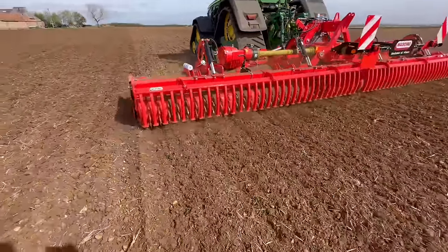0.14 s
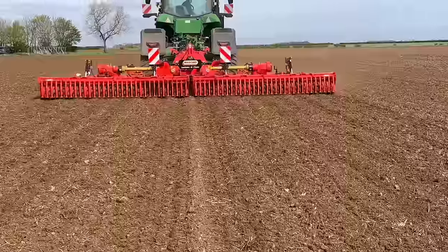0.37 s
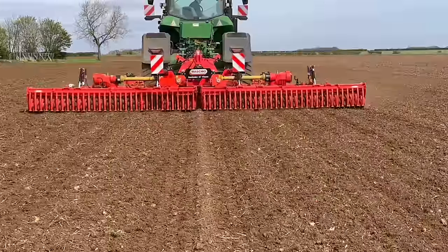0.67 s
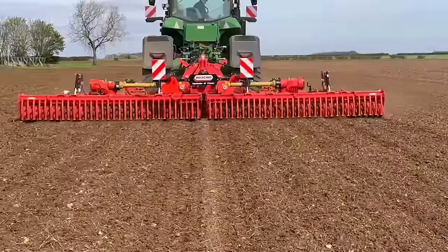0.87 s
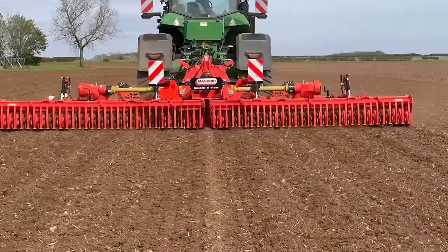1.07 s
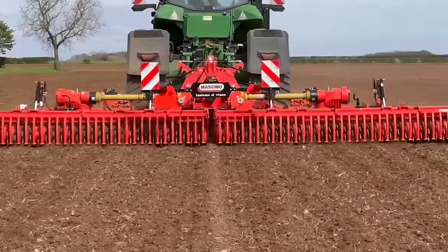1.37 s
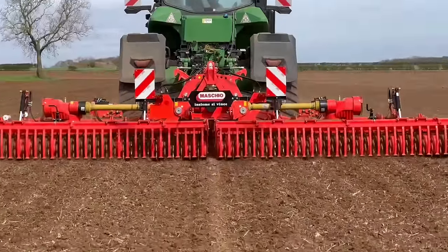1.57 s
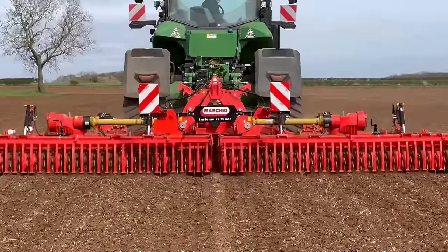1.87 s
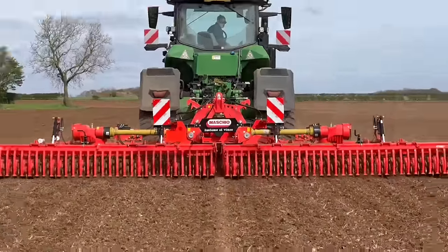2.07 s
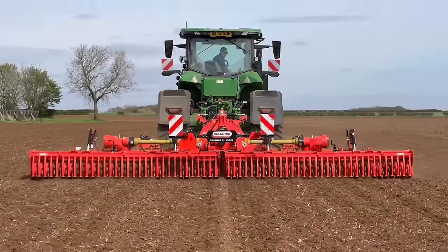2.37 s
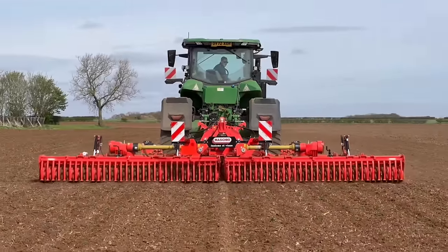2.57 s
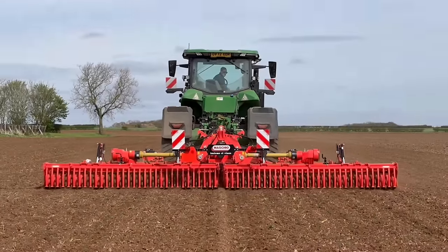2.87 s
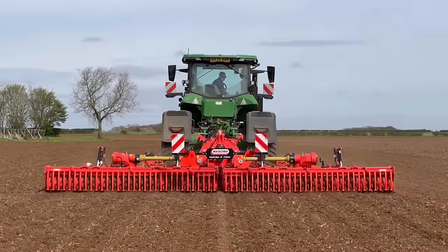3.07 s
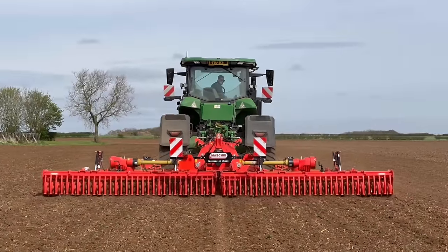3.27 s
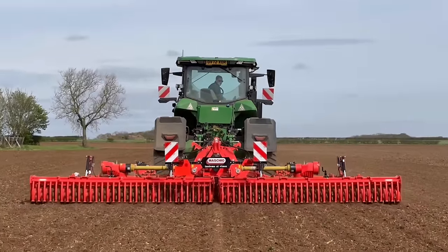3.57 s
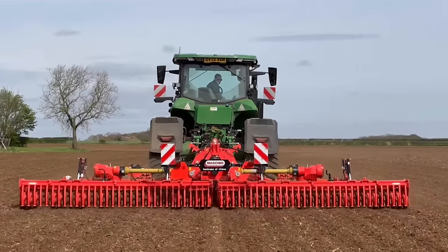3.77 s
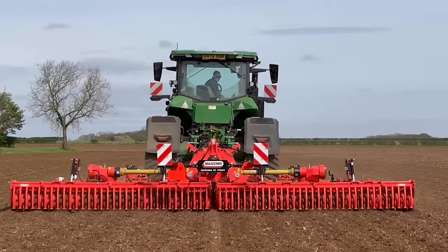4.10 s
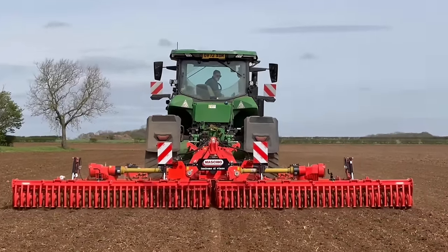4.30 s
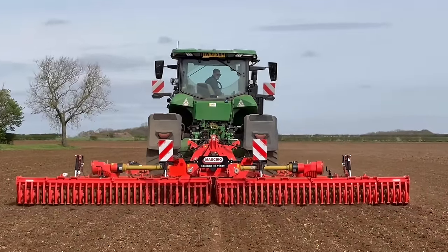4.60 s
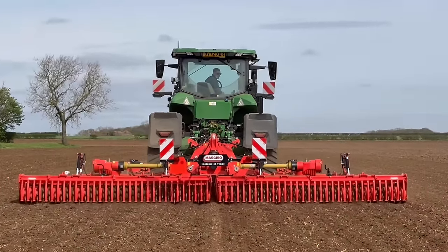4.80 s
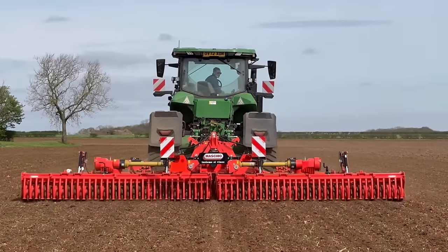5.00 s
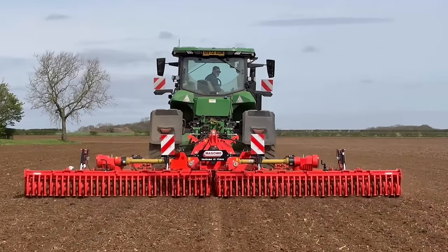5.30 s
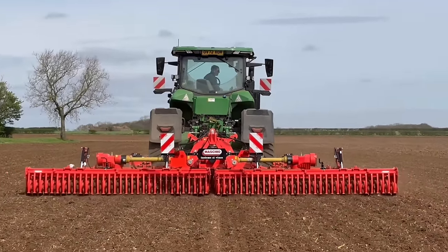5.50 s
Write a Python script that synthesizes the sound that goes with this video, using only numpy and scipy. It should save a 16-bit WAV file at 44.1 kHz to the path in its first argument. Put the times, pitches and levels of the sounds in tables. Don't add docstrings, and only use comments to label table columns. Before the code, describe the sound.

A loud bright burst of steel tines grinding dry soil close by cuts to a quieter, whining harrow behind a tractor, with thumping wind.

```python
import sys
import numpy as np
from scipy import signal
from scipy.fft import rfft, irfft
from scipy.io import wavfile
from scipy.ndimage import uniform_filter1d, map_coordinates

SR = 44100
rng = np.random.default_rng(int(sys.argv[2]) if len(sys.argv) > 2 else 0)


def wrap_up_sound(samples):
    columns = np.atleast_2d(samples).T
    tamed = np.clip(columns, -1, 1)
    steps = np.round(tamed * 32767).astype(np.int16)
    wavfile.write(sys.argv[1], SR, steps)


def to_linear_factor(level_db):
    exponent = np.asarray(level_db, float) / 20
    return 10 ** exponent


N = 249165

CUT_S = 0.299
RECEDE_DB_PER_S = 1.395
BAR_CYCLES = 130

# start in seconds, peak level in dB, ring pitch in Hz, ring t60 in seconds, share of the crack (0-1).
STONE_HITS = [
    (1.071, -27.5, 4620, .05, .6),
    (1.41, -34, 3940, .04, .3),
    (1.854, -36, 3640, .03, .25),
    (2.85, -36.5, 5800, .07, .3),
    (2.926, -40, 6000, .03, .15),
    (3.229, -36.5, 5800, .1, .3),
    (3.366, -41, 6100, .03, .3),
    (4.854, -39, 8200, .04, .3),
]


def rms_one(x):
    return x / np.sqrt(np.mean(np.abs(x) ** 2) + 1e-20)


def in_time(rows):
    s, *columns = np.transpose(rows)
    return [np.interp(np.arange(N) / SR, s, c) for c in columns]


def drift(rate_hz, count=N, per_s=SR):
    hop = max(int(per_s / 2000), 1)
    r = np.exp(-2 * np.pi * rate_hz * hop / per_s)
    settle = count // hop + 1
    noise = rng.standard_normal(2 * settle)
    slow = signal.lfilter([1], [1, -2 * r, r * r], noise)[settle - 1:]
    return np.interp(np.arange(count) / hop, np.arange(len(slow)), rms_one(slow))


def colour(x, spectrum, resonances=()):
    hz = np.maximum(np.fft.rfftfreq(N, 1 / SR), 1)
    points = np.array(spectrum)
    db = np.interp(np.log(hz), np.log(points[:, 0]), points[:, 1])
    for centre_hz, width_hz, peak_db in resonances:
        db += peak_db / (1 + ((hz - centre_hz) / width_hz) ** 2)
    return irfft(rfft(x) * to_linear_factor(db), N)


def band_rms(x, low_hz, high_hz):
    band = signal.butter(4, [low_hz, high_hz], "band", fs=SR, output="sos")
    return np.std(signal.sosfilt(band, x))


def grit(per_s, spread_db, noise_share):
    sizes = to_linear_factor(spread_db * np.minimum(rng.exponential(1, N), 5)) * rng.choice([-1, 1], N)
    clicks = rms_one(sizes * (rng.random(N) < per_s / SR))
    return clicks + noise_share * rng.standard_normal(N)


def clatter(per_s, cycles):
    bars = 40
    clicks = grit(per_s, 2.0, noise_share=0)
    dealt = rng.integers(0, bars, N)
    bar_hz = np.geomspace(2800, 14000, bars) * rng.uniform(.98, 1.02, bars)
    out = np.zeros(N)
    for k, hz in enumerate(bar_hz):
        r = to_linear_factor(-60 * hz / (cycles * SR))
        w = 2 * np.pi * hz / SR
        struck = clicks * (dealt == k) + 1e-18
        out += hz * np.sin(w) * signal.lfilter([1], [1, -2 * r * np.cos(w), r * r], struck)
    return rms_one(out)


def tooth_tone(hz, wobble_hz, rough):
    uneven = drift(wobble_hz) + 1j * drift(wobble_hz)
    turning = np.exp(2j * np.pi * np.cumsum(hz * np.ones(N)) / SR)
    return rms_one(np.real((1 + rough * uneven) * turning))


def tines_beside():
    # time in seconds, level in dB, extra grit in dB.
    passing = [
        (0.0, -17, 2),
        (0.1, -18.5, -0.5),
        (0.162, -18.5, -2),
        (0.22, -19, -3),
        (0.245, -19, 1.5),
        (0.295, -18.5, 0.5),
    ]
    # frequency in Hz, density in dB per Hz.
    near_spectrum = [(18, -40), (30, 1), (102, -1.5), (284, -9.5), (409, -8), (443, -6.5), (829, -7),
                     (1080, -5.5), (1590, -2), (2620, -8), (5300, -18), (8270, -25.5), (15500, -35)]
    # centre in Hz, width in Hz, height in dB.
    near_resonances = [(817, 64, 10.5), (1254, 74, 11.5), (1627, 22, 6), (2600, 220, 5), (3045, 96, 5.5),
                       (3740, 37, 8), (4280, 93, 5.5), (4740, 32, 7), (5980, 79, 6), (8060, 260, 8.5),
                       (1100, 110, -5.5), (1357, 160, -9.5), (2915, 33, -23)]
    # pitch in Hz, rms in dB.
    near_lines = [(147, -39.5), (411, -40.5)]
    rubbing = grit(9000, 1.2, noise_share=2.0) + 1.27 * clatter(5000, BAR_CYCLES)
    sound = colour(rubbing, near_spectrum, near_resonances)
    level_db, grit_db = in_time(passing)
    grit_band = signal.butter(2, 4200, "high", fs=SR, output="sos")
    sound += (to_linear_factor(grit_db) - 1) * signal.sosfilt(grit_band, sound)
    sound *= to_linear_factor(level_db + .5 * drift(15.0)) / band_rms(sound, 300, 12000)
    return sound + sum(to_linear_factor(db) * tooth_tone(hz, 11.0, rough=0.18) for hz, db in near_lines)


def ground_db(hz, at=slice(None)):
    # time in seconds, fifth comb peak in Hz, comb depth in dB.
    echo = [
        (0.31, 6080, 0.7),
        (2.4, 6060, 0.7),
        (3.2, 5800, 0.1),
        (3.9, 5970, 2),
        (4.3, 5680, 4),
        (4.7, 6080, 3),
        (4.95, 6120, 5),
        (5.15, 6050, 3),
        (5.45, 5970, 1.5),
        (5.65, 5940, 2.5),
    ]
    peak_hz, depth_db = in_time(echo)
    comb = np.cos(2 * np.pi * 5 * hz / peak_hz[at])
    return depth_db[at] * comb * np.interp(hz, [1930, 3300, 8500, 10500], [0, 1, 1, 0])


def gears():
    # time in seconds, place (0 close behind, 1 low in the wake, 2 trailing).
    places = [
        (2.45, 0),
        (2.65, 1),
        (3.65, 1),
        (3.9, 2),
    ]
    # time in seconds, whine swing in dB.
    load_swing = [(.31, 4.5), (.5, 5.5), (.72, -4), (1.4, 1), (1.66, -22), (1.79, 4), (1.97, 9.5),
                  (2.12, -11.5), (2.52, 10.5), (2.68, -6), (2.9, 0.5), (3.02, -3.5), (3.75, 4.5),
                  (3.88, -5), (3.98, 0), (4.98, 3.1), (5.07, -4), (5.25, .6)]
    # rms in dB close behind, in the wake and trailing, share of load swing.
    mesh_lines = [(-38.5, -45.5, -44.5, 0.15), (-43.5, -45, -49.5, .2), (-35.5, -36, -35.5, 0.75)]
    whine_rough = [.24, .24, .1]
    # sets in, full, lifts, gone (seconds).
    null_times = [2.45, 2.7, 3.46, 3.64]
    pair_rates = [1032, 1442, 1540, 1621, 1662, 1771, 1853, 2003, 2062, 2179, 2490, 2915, 3105, 3432, 3752,
                  4713]
    # rms in dB close behind, in the wake and trailing, wobble width in Hz.
    pair_levels = [(-49, -52, -51.5, 3), (-53, -55, -58, 3), (-48, -46, -51, 6), (-44, -51, -51, 10),
                   (-50, -54, -48, 12), (-55, -53, -52, 8), (-52, -46, -52, 8), (-54, -53, -53, 12),
                   (-50, -51, -55, 8), (-49, -50, -55, 5), (-55, -59, -54, 6), (-50, -50, -39.5, 60),
                   (-57, -54, -42.5, 10), (-53, -51, -44.5, 40), (-55, -56, -50.5, 25), (-62, -64, -54, 40)]
    tooth_hz = 409.65
    stage, = in_time(places)
    load_db, = in_time(load_swing)

    def at_place(values):
        return np.interp(stage, [0, 1, 2], values)

    first, second, third = [at_place(place_db) + share * load_db for *place_db, share in mesh_lines]
    null_db = -20 * np.interp(np.arange(N) / SR, null_times, [0, 1, 1, 0])
    out = to_linear_factor(first + null_db) * tooth_tone(tooth_hz, 5.6, rough=0.0085)
    out += to_linear_factor(second) * tooth_tone(2 * tooth_hz, 20.0, rough=.22)
    out += to_linear_factor(third) * tooth_tone(3 * tooth_hz, 38.0, rough=at_place(whine_rough))
    for hz, (*place_db, wobble_hz) in zip(pair_rates, pair_levels):
        level_db = at_place(place_db) + 1.1 * drift(1.5) + 1.9 * ground_db(hz)
        out += to_linear_factor(level_db) * tooth_tone(hz, wobble_hz, rough=wobble_hz / 7)
    return out


def spray():
    rise_s, fall_s = .007, .028
    late = np.arange(N) / SR - np.array(STONE_HITS)[:, :1]
    return np.max(np.exp(np.where(late < 0, late / rise_s, -late / fall_s)), axis=0)


def surges(x, band_db, shared_db, own_db):
    band_centres = [750, 1900, 3600, 7000, 12500]
    hz, s, cells = signal.stft(x, SR, nperseg=256)
    steps, per_s = len(s), SR / 128
    at = np.minimum((s * SR).astype(int), N - 1)
    place = np.interp(np.log(hz + 1), np.log(band_centres), np.arange(len(band_centres)))
    burst = shared_db * drift(14.0, count=steps, per_s=per_s)
    burst -= uniform_filter1d(burst, size=int(per_s / 5))
    rows = []
    for k, db in enumerate(band_db):
        own = own_db * drift(7.0, count=steps, per_s=per_s)
        rows.append(db[at] + burst * (min(k, 3) / 3) ** 3 + own)
    grid_points = np.meshgrid(place, np.arange(steps), indexing="ij")
    gain_db = map_coordinates(np.array(rows), grid_points, order=1)
    gain_db += ground_db(hz[:, None], at)
    return signal.istft(cells * to_linear_factor(gain_db), SR, nperseg=256)[1][:N]


def tines_behind():
    # frequency in Hz, density in dB per Hz.
    grind_spectrum = [(150, -49), (250, -58), (341, -20.5), (420, -6.5), (755, -8.5), (823, -6.5),
                      (1100, -7), (1220, -2), (1360, -8), (1590, -4), (2620, -7.5), (3450, -14),
                      (4030, -13.5), (15500, -42.5)]
    # centre in Hz, width in Hz, height in dB.
    trough_resonances = [(816, 285, 1), (1227.5, 39, 9), (1529, 15, 7), (1664, 16.4, 5.5), (2030, 30, 4),
                         (2974, 530, 5.5), (3080, 22, -2), (3405, 33, 9), (3714, 20.6, 6), (4490, 470, 2.5),
                         (6230, 210, 2.5), (8100, 520, 5.5), (10960, 1300, 5), (1276, 150, -3.5),
                         (2637, 55, -11), (6990, 570, -3), (9400, 550, -7.5)]
    # time in seconds, treble in dB.
    open_view = [(.31, -2.5), (1.3, -0.5), (2.45, -0.5), (2.65, -6), (3.55, -3.5), (3.72, -2), (3.9, 2),
                 (4.25, 2), (4.95, 2.5), (5.1, 2.5), (5.65, 4.5)]
    view_shares = [.05, .25, .7, 1.05, 1.4]
    spray_shares = [.6, .8, .8, .8, .3]
    rubbing = grit(6000, 2.24, noise_share=1.76) + 1.22 * clatter(4000, BAR_CYCLES)
    sound = colour(rubbing, grind_spectrum, trough_resonances)
    sound /= band_rms(sound, 500, 1100)
    level_db = -36 - RECEDE_DB_PER_S * np.arange(N) / SR
    view_db, = in_time(open_view)
    spray_db = 3.5 * spray()
    band_db = [level_db + view * view_db + thrown * spray_db for view, thrown in zip(view_shares, spray_shares)]
    return surges(sound, band_db, shared_db=1.16, own_db=0.74)


def engine():
    # pitch in Hz, rms in dB.
    exhaust_orders = [(49, -52), (98, -52), (147, -47), (196, -53), (243, -57)]
    orders = sum(to_linear_factor(db) * tooth_tone(hz, 6.3, rough=0.31) for hz, db in exhaust_orders)
    return to_linear_factor(0.5 - RECEDE_DB_PER_S * np.arange(N) / SR) * orders


def tracks():
    # frequency in Hz, density in dB per Hz.
    rumble_spectrum = [(15, -46), (27, -9), (36, -1), (46, -1.5), (62, -16), (90, -63)]
    return to_linear_factor(-36) * rms_one(colour(rng.standard_normal(N), rumble_spectrum))


def wind():
    # time in seconds, steady thump in dB, rustle of small eddies in dB.
    wind_levels = [(.36, -35, -39), (.55, -32, -33.5), (.8, -26, -23.5), (1.0, -32.5, -29.5),
                   (1.58, -22.5, -30.5), (1.77, -18.5, -24.5), (1.93, -24.5, -27.5), (2.2, -20.5, -30),
                   (2.6, -26.5, -28), (2.85, -31.5, -32), (3.3, -26, -33), (3.7, -29, -35),
                   (3.95, -27, -37), (4.09, -30.5, -37.5), (4.25, -33, -33), (4.5, -33, -37.5),
                   (5.14, -33.5, -35), (5.65, -35.5, -39.5)]
    # frequency in Hz, density in dB per Hz.
    thump_spectrum = [(3.5, -52), (7, -3.5), (15, 9), (28, 3), (40, -3.5), (52, -11.5), (65, -26.5),
                      (90, -63), (150, -66)]
    # frequency in Hz, density in dB per Hz.
    rustle_spectrum = [(29, -56), (50, 0.5), (118, -15.5), (156, -17.5), (330, -33.5), (430, -43),
                       (730, -120)]
    # centre in seconds, peak in dB.
    gust_peaks = [(.38, -16), (.5, -21.5), (.59, -27), (.66, -14.5), (.74, -16.5), (.83, -28), (.97, -13),
                  (1.06, -18), (1.18, -18.5), (1.32, -23), (1.45, -17), (1.63, -28), (1.76, -26),
                  (1.86, -15.5), (1.98, -24), (2.15, -30), (2.27, -23), (2.4, -18), (2.52, -11.5),
                  (2.6, -21.5), (2.69, -17.5), (3.12, -21), (3.22, -31), (3.37, -23), (3.54, -30),
                  (3.82, -27), (4.03, -33), (4.63, -32), (5.16, -43)]
    gust_s = 0.027
    t = np.arange(N) / SR
    steady_db, rustle_db = in_time(wind_levels)
    thump = colour(rng.standard_normal(N), thump_spectrum)
    rustle = colour(rng.standard_normal(N), rustle_spectrum)
    thump /= np.sqrt(uniform_filter1d(thump ** 2, size=SR // 10))
    rustle /= np.sqrt(uniform_filter1d(rustle ** 2, size=SR // 10))
    gusts = sum(to_linear_factor(db) * np.exp(-.5 * ((t - s) / gust_s) ** 2) for s, db in gust_peaks)
    flutter_db = 1.5 * drift(5.4)
    return (to_linear_factor(steady_db) + gusts) * thump + to_linear_factor(rustle_db + flutter_db) * rustle


def stones():
    out = np.zeros(N)
    t = np.arange(SR // 8) / SR
    noise = rng.standard_normal((len(STONE_HITS), len(t)))
    cracks = signal.lfilter([.6], [1, -1.2, .4], noise)
    for (s, peak_db, hz, t60, share), crack in zip(STONE_HITS, cracks):
        ring = sum(np.sin(2 * np.pi * detune * hz * t) for detune in (.996, 1, 1.003)) / 2
        hit = ring * to_linear_factor(-60 * t / t60) + share * crack * to_linear_factor(-60 * t / 0.045)
        hit *= np.minimum(t / 0.0015, 1)
        at = round(s * SR)
        out[at:at + len(t)] += to_linear_factor(peak_db) * hit[:N - at]
    return out


def scene():
    behind = np.clip((np.arange(N) / SR - CUT_S) / .002, 0, 1)
    far = gears() + tines_behind() + engine() + tracks() + wind() + stones()
    return ((1 - behind) * tines_beside() + behind * far)[None]


def band_limit(x):
    return signal.sosfilt(signal.butter(12, 15630, fs=SR, output="sos"), x)


def record(dry):
    mix = 0.83 * np.tanh(dry / 0.79)
    return band_limit(mix)


dry = scene()
out = record(dry)
wrap_up_sound(out)
```